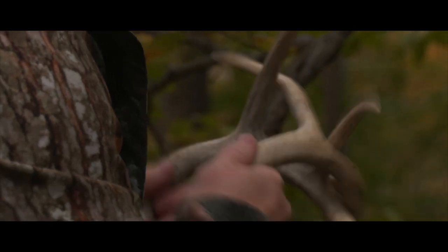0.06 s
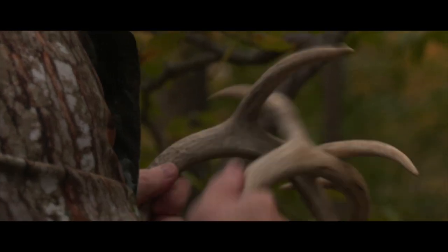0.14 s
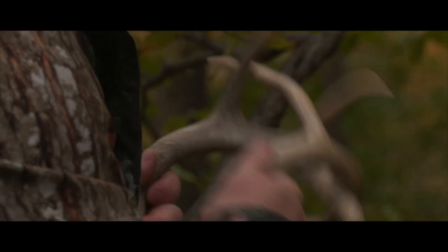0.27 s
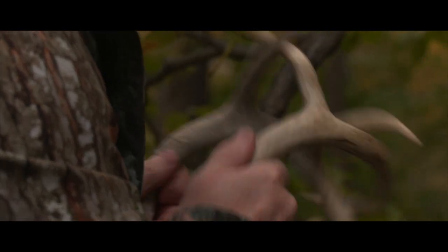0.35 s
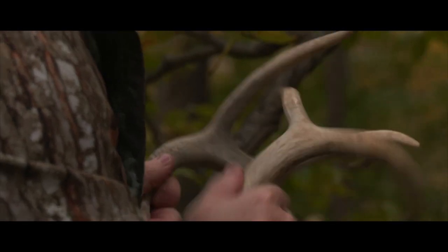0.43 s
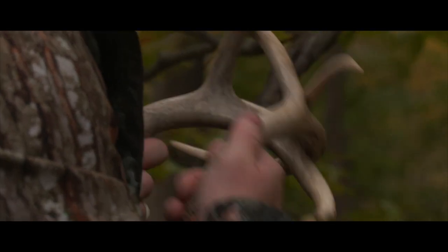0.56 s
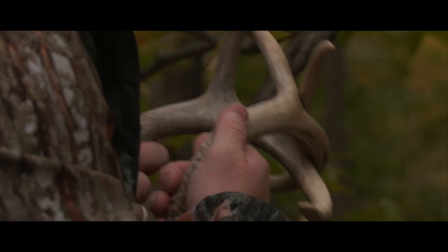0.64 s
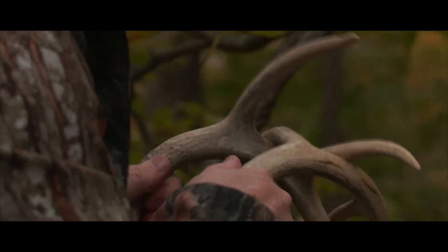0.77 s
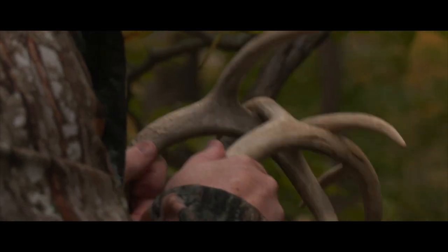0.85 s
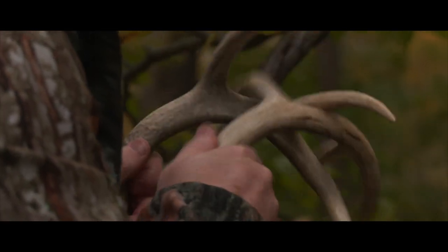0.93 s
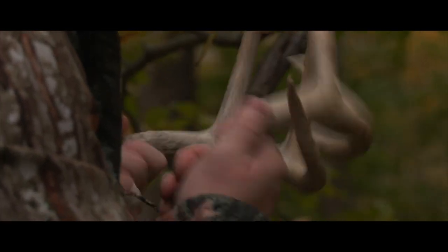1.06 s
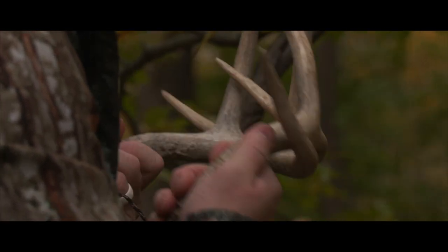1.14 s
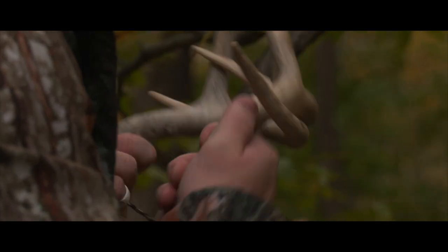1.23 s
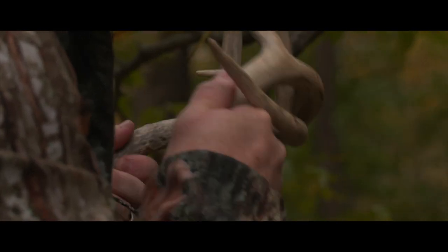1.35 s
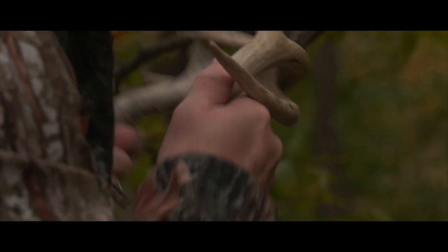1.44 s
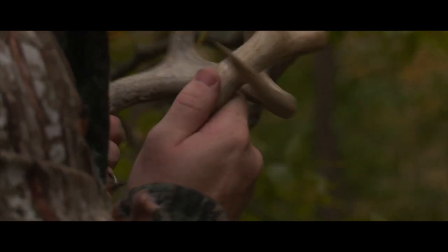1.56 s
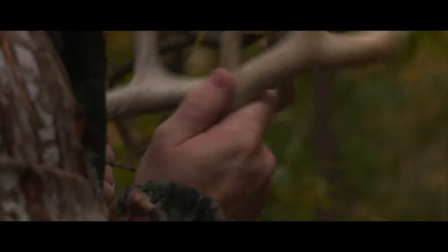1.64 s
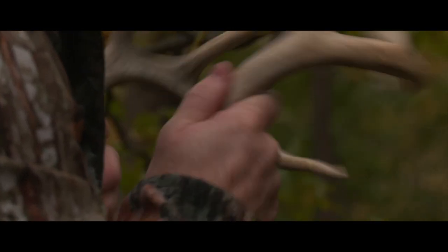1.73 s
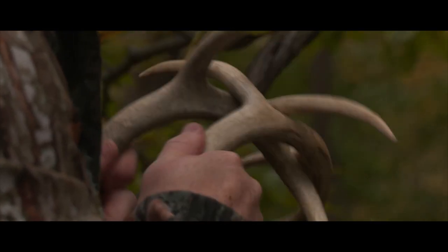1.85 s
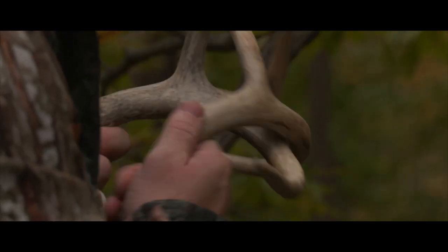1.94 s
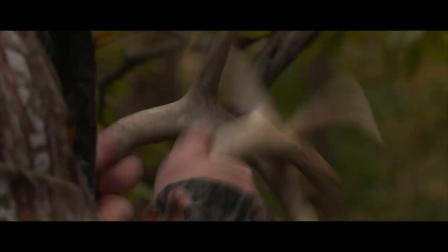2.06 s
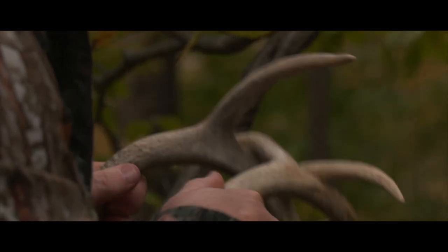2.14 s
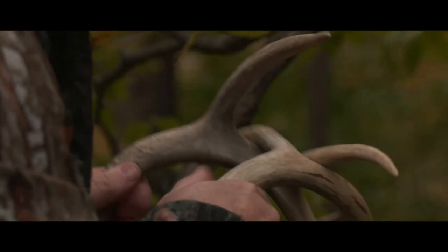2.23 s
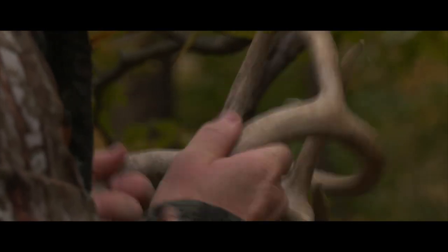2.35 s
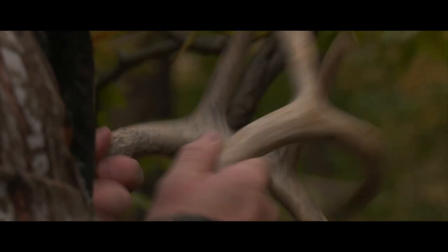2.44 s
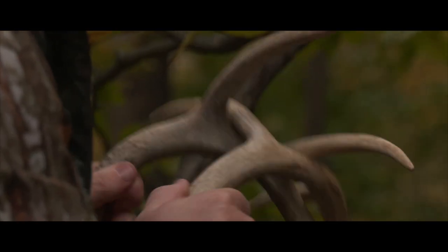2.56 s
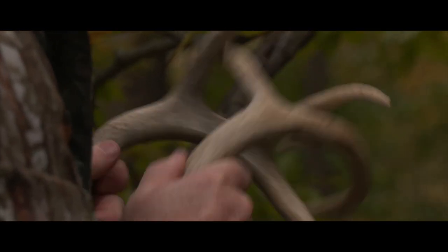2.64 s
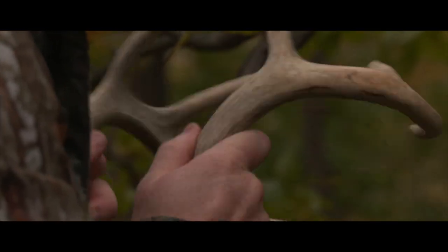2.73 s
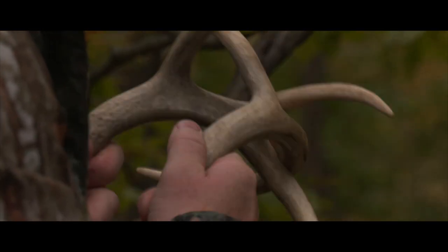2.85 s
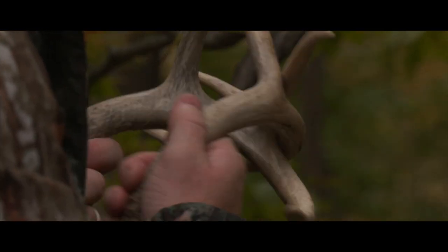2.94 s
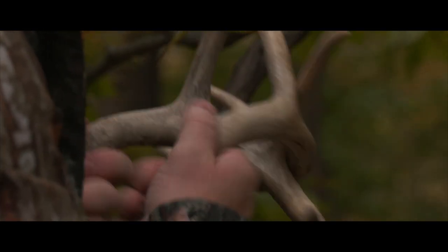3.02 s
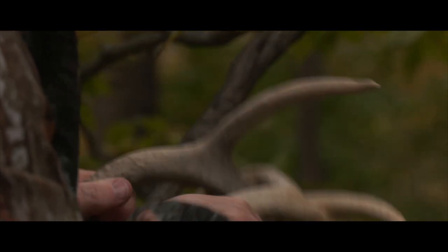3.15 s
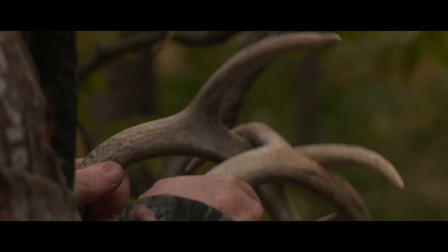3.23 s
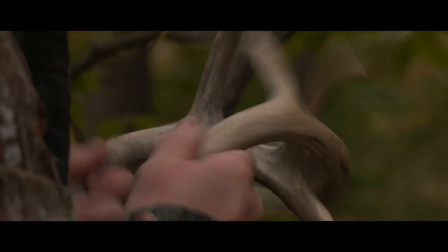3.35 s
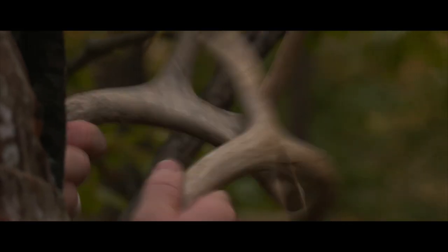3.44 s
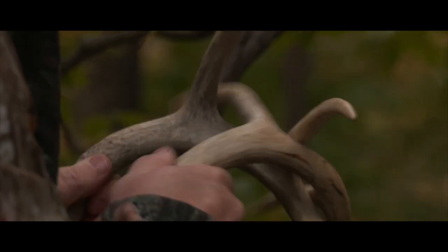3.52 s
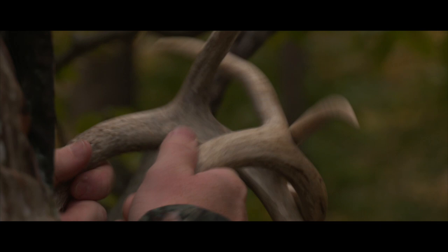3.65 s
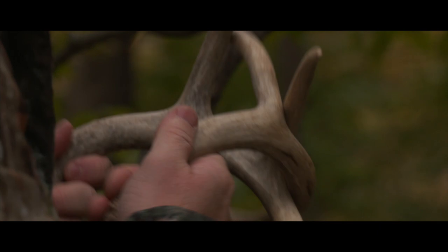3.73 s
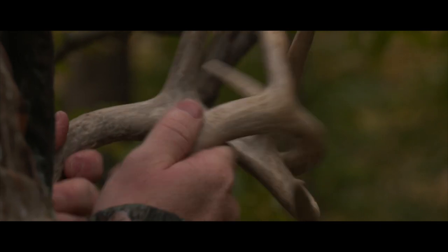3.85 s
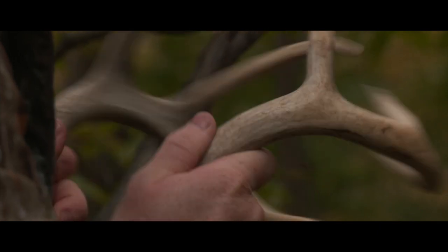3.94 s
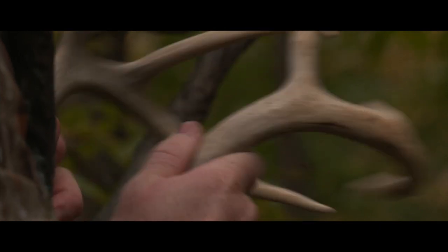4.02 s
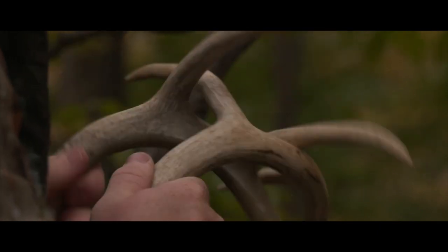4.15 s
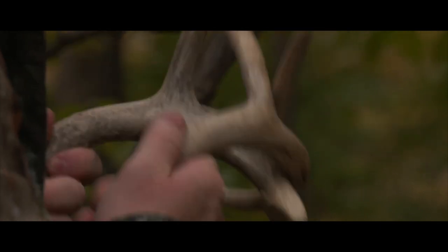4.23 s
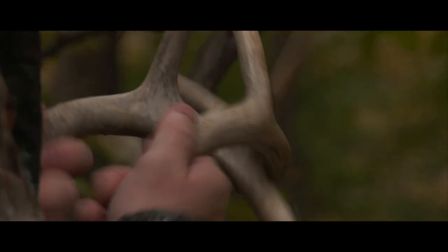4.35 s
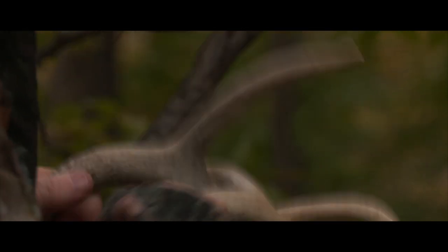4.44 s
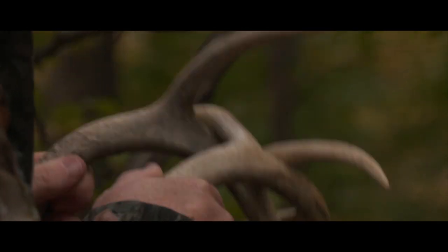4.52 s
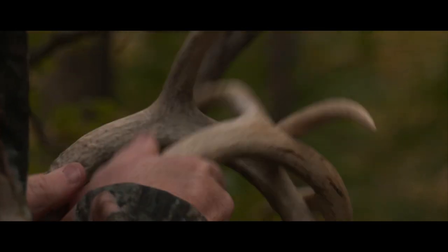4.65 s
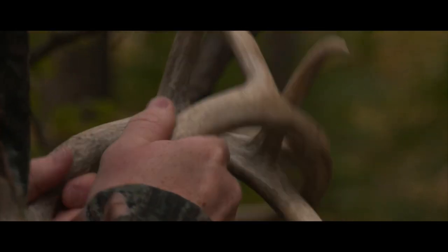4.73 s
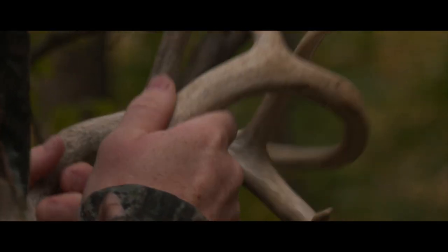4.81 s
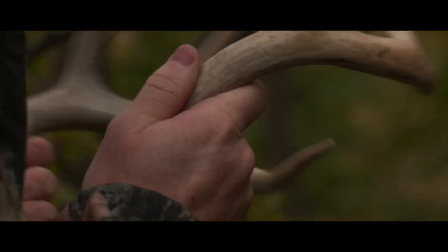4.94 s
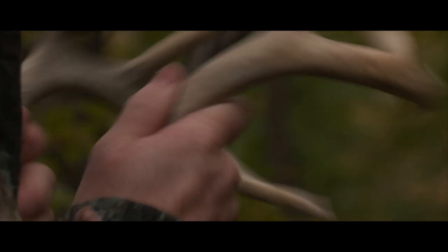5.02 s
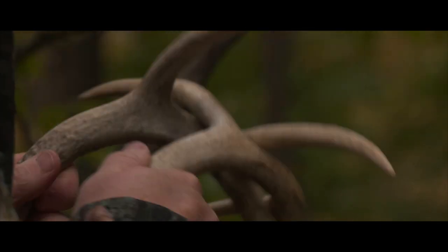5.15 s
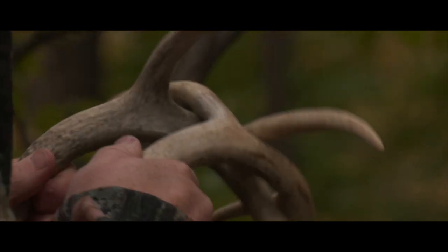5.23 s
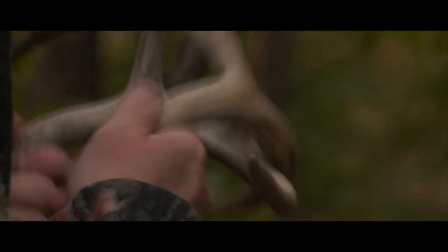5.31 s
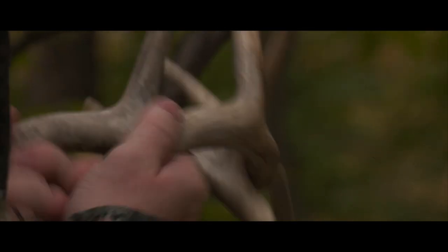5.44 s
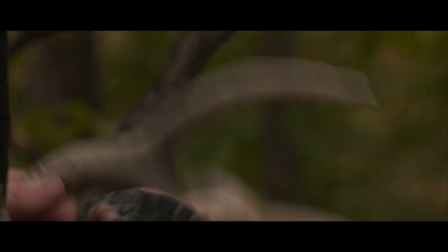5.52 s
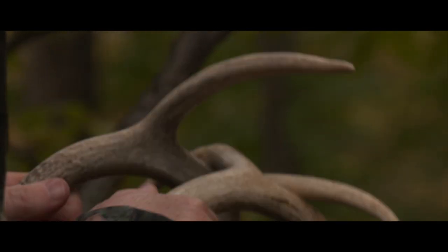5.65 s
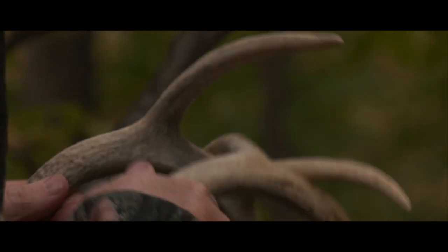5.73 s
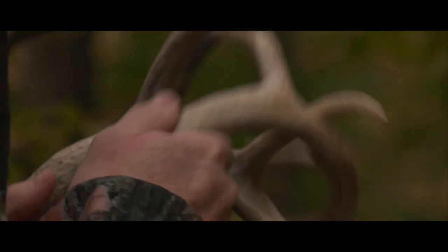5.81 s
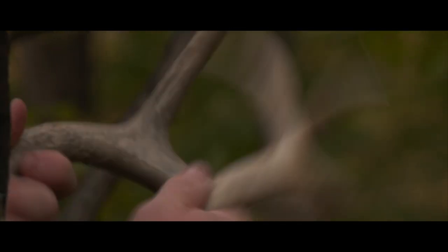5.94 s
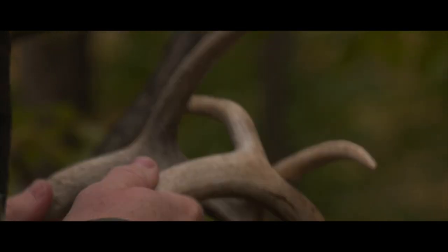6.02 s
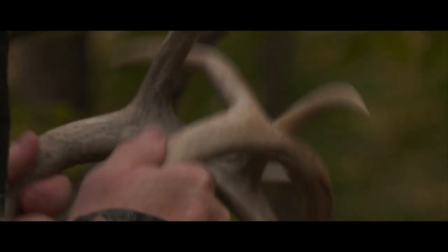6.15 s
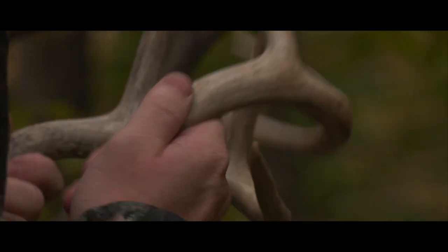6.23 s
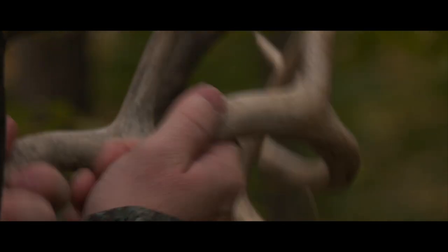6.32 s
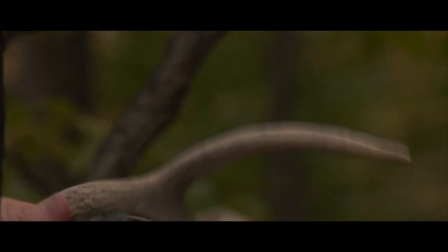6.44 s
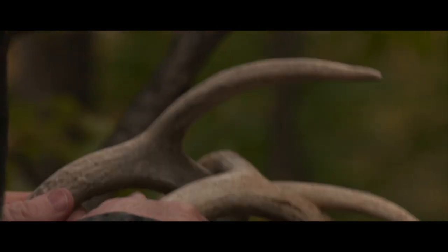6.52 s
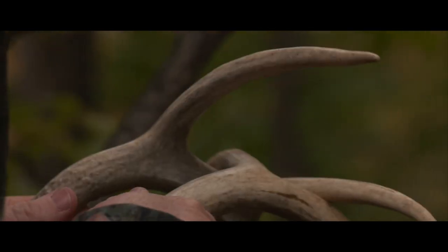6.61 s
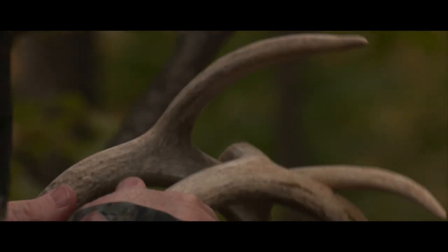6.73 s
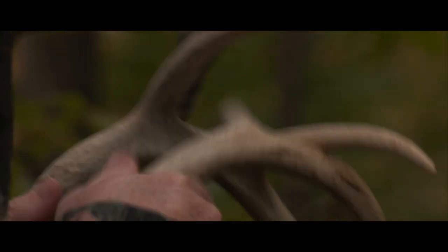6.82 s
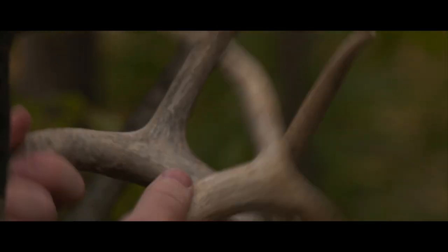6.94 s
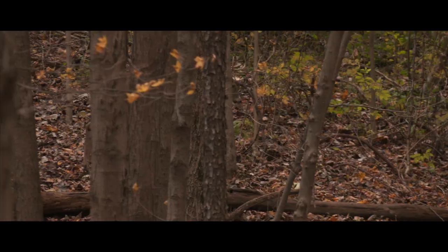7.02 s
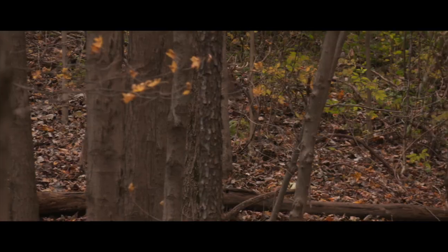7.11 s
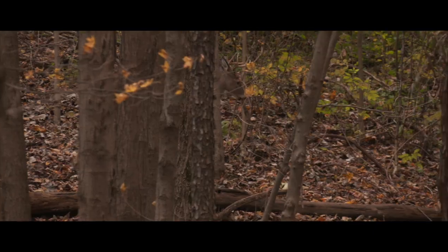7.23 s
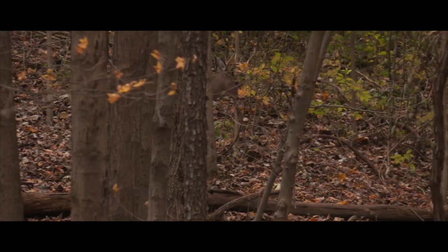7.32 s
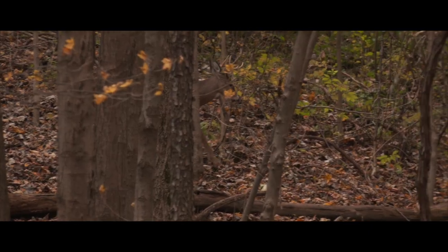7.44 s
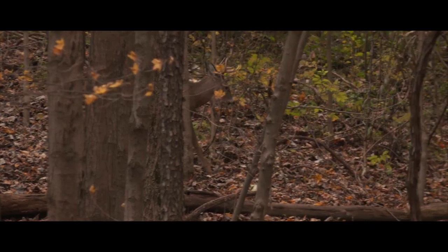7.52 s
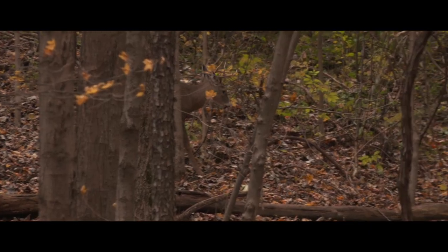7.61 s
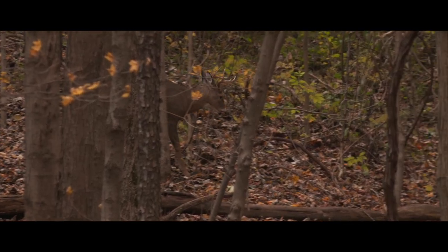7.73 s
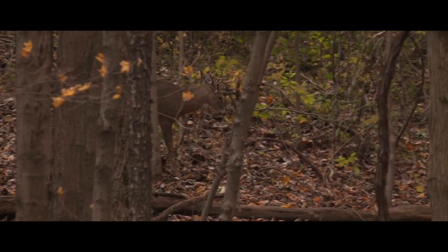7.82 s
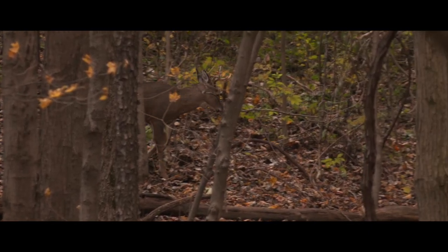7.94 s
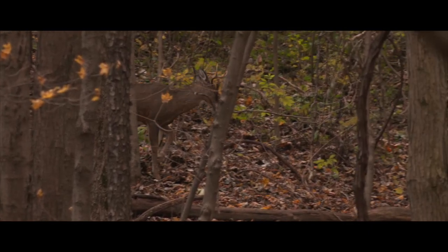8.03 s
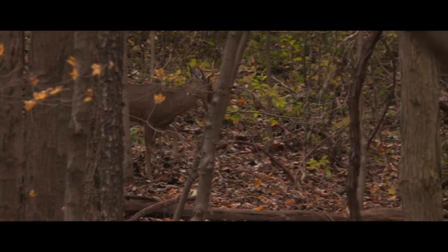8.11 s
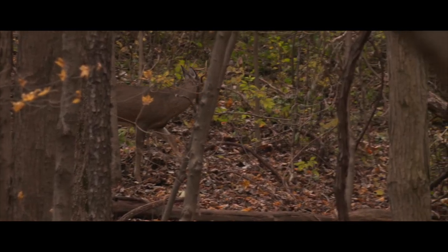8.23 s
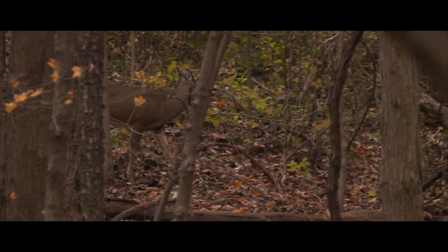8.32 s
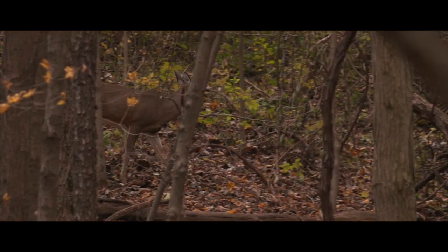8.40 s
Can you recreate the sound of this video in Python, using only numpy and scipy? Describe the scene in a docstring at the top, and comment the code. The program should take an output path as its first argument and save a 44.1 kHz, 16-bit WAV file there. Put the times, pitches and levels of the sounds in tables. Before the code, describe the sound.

Two deer antlers clack, rattle and scrape together by hand in irregular bursts, close up, then an abrupt cut to quiet woodland with faint birds.

```python
"""Two deer antlers are clacked and ground together by hand, close to the microphone, over the air of a wood.
From the start the air hisses and rumbles; soon the beams scrape by stick and slip, and blows ring short bone
modes. Each blow chatters, rebounds and carries a low thump, while trunks scatter a faint echo as decaying
noise. Just after the last clack the scene changes: all but the low rumble crossfades within 10 ms to a quieter
wood: leaf hiss of shaped noise, a far engine of a few wavering sines, gliding bird notes and one snapping twig."""
import sys
import numpy as np
from scipy import signal
from scipy.fft import rfft, irfft, next_fast_len
from scipy.io import wavfile
from scipy.ndimage import uniform_filter1d

SR = 44100
rng = np.random.default_rng(int(sys.argv[2]) if len(sys.argv) > 2 else 0)


def store_pcm(level_fs):
    """Save levels as 16-bit WAV."""
    pcm = np.round(np.clip(level_fs, -1, 1) * 32767).astype(np.int16)
    wavfile.write(sys.argv[1], SR, np.atleast_2d(pcm).T)


N = 373527
TIME = np.arange(N) / SR  # seconds

# Low rumble of the air. Each row: time in seconds, relative level in dB.
RUMBLE_LEVELS = [(0.0, -66.5), (0.52, -50.5), (1.67, -59), (2.64, -55), (3.28, -65.5), (3.73, -57),
                 (4.51, -65), (4.93, -57.5), (5.12, -67), (5.92, -61.5), (8.26, -64.5), (8.47, -62.5)]
# Spectrum of the rumble. Each row: frequency in Hz, relative level in dB.
RUMBLE_COLOUR = [(25, -21.5), (40, -7), (60, -1.5), (80, -1), (110, -1), (230, -13.5), (400, -19.5)]
# Low buffets of moving arms or air on the microphone.
# Each row: time of its height in seconds, half-length in seconds, level in dB.
BUFFETS = [(0.345, .06, -46), (.46, .08, -41.5), (0.964, .06, -46), (1.273, .08, -50.5), (2.45, .05, -49),
           (4.765, .05, -54), (6.348, .05, -52.5), (7.832, .07, -56), (8.298, .07, -58)]
# Air of the wood during the rattling. Each row: frequency in Hz, relative level in dB.
NEAR_AIR_COLOUR = [(100, -2.5), (185, -0.5), (330, -7), (800, -11), (1500, -12), (2600, -15), (3800, -16.5),
                   (5000, -10.5), (6300, -11), (7800, -23.5), (10500, -35.5), (15500, -40.5)]
# What the trees receive, and what they scatter. Each row: frequency in Hz, relative level in dB.
RADIATED_COLOUR = [(300, -21.5), (1400, -13.5), (2400, -9.5), (3400, -3.5), (4300, -2.0), (5300, 6),
                   (6500, -3.5), (7800, -18), (10000, -27.5), (15000, -39.5)]
ECHO_COLOUR = [(200, 9.0), (1500, 0.5), (4000, -3.5), (5300, -8.5), (6400, 0.0), (9000, -2.5), (15000, -8)]
# Bending modes of the pair of antlers.
# Each row: frequency in Hz, relative level in dB, t60 as a multiple of the contact's.
BONE_MODES = [(600, -10.5, 1.6), (868, -9.5, 1.6), (1222, -25, 1.5), (1250, -14, 1.5), (1443, -3.5, 1.7),
              (1827, -4.5, 1.5), (1982, -14, 1.3), (2234, -10, 1.3), (2394, -13, 1.4), (2910, -9, 1.3),
              (3030, -4, 1.3), (3287, -3, 1.1), (3510, 0, 1.2), (3727, -7, 1.1), (4080, -9, 1.1),
              (4920, -11, 1), (4920, -0.5, 1), (5085, -6, 1), (5380, 6, 1), (5690, 1.5, .9), (6330, -6, .9),
              (6753, -2, .9), (6920, -16.5, .8), (7495, -12.5, .8), (7950, -5, .7), (8740, -18, .7),
              (9220, -12, .7), (10400, -26.5, .6), (10640, -29.5, .5), (12970, -33, .5)]
# Bright crack and duller shiver of the bone. Each row: frequency in Hz, relative level in dB.
CRACK_COLOUR = [(200, -8.5), (1000, -12), (3000, 5.5), (5300, 1.5), (7000, -6.5), (10000, -13.5),
                (15000, -31.0)]
SHIVER_COLOUR = [(300, -12), (1400, -13), (3300, 1.5), (5300, -2), (6700, -3.0), (8000, -11.5),
                 (10000, -32.0), (15000, -43.0)]
# Deliberate rubs of beam along beam.
# Each row: start in seconds, end in seconds, relative level at the start in dB, at the end in dB.
SCRAPES = [(.055, .07, -44, -45), (.334, .349, -46.5, -43.5), (.349, .41, -31.5, -41.5),
           (.943, .98, -59.5, -43.5), (1.502, 1.532, -42.5, -46), (1.554, 1.633, -46.5, -36.5),
           (2.327, 2.4, -46, -39), (2.43, 2.455, -51.5, -41), (2.634, 2.696, -39, -47),
           (2.69, 2.735, -42, -33.5), (3.654, 3.687, -43, -58.5), (3.76, 3.898, -57, -50),
           (4.361, 4.414, -49, -43), (5.392, 5.42, -44.5, -53.5), (5.88, 5.976, -42.5, -44),
           (6.334, 6.36, -48, -39)]
# Blows of antler on antler. Each row: start in seconds, strength in dB, hardness in dB (0 = beam on beam,
# 12 = tip on tip), hollow knock of the beam in dB, pitch of the struck tine in Hz.
BLOWS = [(0.0736, -17.5, 1.5, 3, 3850), (0.2114, -20.5, 1.5, -0.5, 4830), (0.2217, -22.5, 3, 4.5, 6650),
         (0.2749, -27.0, 2, 1.5, 4900), (0.3485, -14.5, 2, -1, 5090), (0.474, -20.5, 2, -3.5, 4100),
         (0.48, -11.5, 12.5, 0, 6100), (0.4995, -27.5, 7, 0.5, 5870), (0.5052, -24.0, -1, -2.5, 3620),
         (0.5128, -15, 4, -2.5, 5500), (0.5271, -11.5, 4, 1.5, 4780), (0.5643, -27.5, 7, -3, 5600),
         (0.7272, -36.5, -5, 1, 3660), (0.7472, -15.5, 4, 2.5, 5230), (0.9871, -24, 3.5, -1, 4910),
         (0.9956, -33.5, 1, 0.5, 4800), (1.0235, -18, 4.5, -2, 4180), (1.0335, -21.5, 4, -5, 5310),
         (1.0439, -16.5, 5.5, -6.5, 3700), (1.0572, -15, 10, -1.5, 5220), (1.0634, -16.5, 5, -7, 3930),
         (1.0713, -24, 6, -4, 5380), (1.078, -21, 11, -5, 6160), (1.1121, -18, 1, 4.5, 4900),
         (1.12, -24, 5, 7, 5520), (1.2155, -24.0, 11.5, -3, 4810), (1.4504, -27.5, 5.5, -1.5, 5300),
         (1.7499, -12.5, 7.5, 2, 5150), (1.7752, -13, 11, 4, 5130), (1.789, -13.0, 13, -0.5, 5060),
         (1.7907, -11.5, 2.5, 0, 5350), (1.8132, -29, 5, -1.5, 4740), (1.91, -24, 0.5, 0.5, 3650),
         (1.936, -20, 3.5, 3, 5390), (2.049, -39.5, -5, 6, 3010), (2.076, -34.5, -4, 6.5, 4840),
         (2.0873, -15, 5, 2, 5320), (2.3382, -24, 3.5, -3, 4845), (2.3524, -23, 1.5, -1, 5460),
         (2.3603, -22.5, -0.5, -4.5, 4180), (2.3689, -24, 10.5, -2.5, 5100), (2.476, -33, 2, 3, 5100),
         (2.4905, -14, 2.5, 4, 4740), (2.8072, -17, 9, -1, 5630), (2.815, -16.5, 14, 3.5, 5600),
         (2.8278, -20.0, 6, -1.5, 5530), (2.846, -18, 1, 0.5, 5000), (2.9236, -18.5, 8.5, -4, 5270),
         (3.0595, -24.5, 0.5, 2.5, 3880), (3.0879, -14, 6.5, 0.5, 5530), (3.3682, -21.5, 5, -3, 5570),
         (3.3753, -24, 3, -4, 5660), (3.3809, -25, 1, 1.5, 5000), (3.3985, -29.5, 2, 1, 5630),
         (3.4591, -26.0, -0.5, 3, 4725), (3.493, -25.0, 7, 5.5, 5370), (3.5093, -24, 2, 1.5, 5030),
         (3.6925, -22.5, 3, -1.5, 3450), (3.869, -30.5, 1.5, 2.5, 5390), (4.0812, -12.5, 12, -6, 5370),
         (4.1053, -11, 8, 1.5, 5310), (4.18, -37.5, 4, 1, 5500), (4.2395, -21, 3, 1.5, 4870),
         (4.4066, -25, -1, 4, 3560), (4.4175, -13.5, 4.5, 2.5, 4890), (4.7657, -29, -2.5, -4, 3330),
         (5.0495, -15.5, 11, -1, 5550), (5.0746, -10, 8.5, 2, 5290), (5.083, -17, 2, -2, 4920),
         (5.311, -29.5, 0, 0, 4830), (5.3303, -24.5, -1, 0, 5060), (5.3401, -28.5, -5, -1.5, 3620),
         (5.4959, -26.5, -1.5, 4, 4150), (5.5083, -13, 3, 2.5, 4770), (5.8048, -26.5, -1.5, 1.5, 4400),
         (5.85, -31, 1, 1, 4860), (5.8761, -16.5, 7, -2, 5620), (5.929, -16.5, 6.5, -6, 5600),
         (5.9847, -13.5, 5, 6, 4760), (6.0317, -17, 0.5, 2, 5370), (6.1805, -26.0, 2.5, -2.5, 5600),
         (6.207, -25.5, 1, -1, 4640), (6.2504, -34.5, 8.5, 1, 5670), (6.3667, -13, 3, -1.5, 3460),
         (6.3786, -25.5, 1, -2, 5120), (6.3963, -11, 5, -0.5, 5200), (6.8744, -25.5, 1, -2.5, 4160),
         (6.8895, -17.0, -0.5, -3.5, 3640), (6.898, -23, 3, 2, 5640), (6.9055, -16.5, 3, 0, 5200),
         (6.978, -20, -3.5, 3, 3420), (7.0032, -29.0, 3, 5.5, 4900)]
# Edges in Hz of the five registers thud, knock, clack, ring, tick.
REGISTER_EDGES = [250, 1100, 2200, 4400, 7200, 16000]
# How a blow shares its energy, for thud, knock, clack, ring, tick in turn.
# Each row: level in dB, dB per dB of hardness, dB per dB of strength, dB per dB of hollow knock.
REGISTER_SHARES = [(-23.5, -0.39, -0.25, 0.58), (-15, -0.92, -0.23, 1.23), (-3.8, -0.65, -0.005, -0.16),
                   (-3, .35, 0, 0), (-16.5, 0.12, 0.16, -0.06)]
# Air of the quiet wood afterwards. Each row: frequency in Hz, relative level in dB.
FAR_AIR_COLOUR = [(100, -8), (200, -13), (400, -13), (700, -20), (1100, -23.5), (1800, -29.5),
                  (2400, -28.5), (3300, -33.5), (4700, -30.5), (6200, -29), (7500, -39), (10000, -42.5),
                  (15500, -41)]
# Lines of a far engine. Each row: frequency in Hz, relative level in dB.
ENGINE_LINES = [(193.8, -67.5), (339.1, -74.5), (387.6, -68.5), (586.8, -76), (780.6, -80)]
# Distant bird notes. Each row: start in seconds, length in seconds, start pitch in Hz,
# middle pitch in Hz, end pitch in Hz, relative level in dB.
BIRD_NOTES = [(7.0, 0.093, 4290, 4180, 4090, -71.5), (7.1, 0.099, 2280, 2790, 2153, -71),
              (7.219, 0.096, 2190, 2107, 2065, -80), (7.489, 0.13, 2070, 2100, 2074, -81),
              (7.9, 0.063, 2180, 2130, 2074, -81), (8.0, .14, 2330, 2460, 2380, -78),
              (8.04, 0.16, 8500, 8720, 8680, -84.5)]
# A twig snaps far off. The single row: start in seconds, relative level in dB.
TWIG = (7.638, -55)
# Spectrum of the snap. Each row: frequency in Hz, relative level in dB.
SNAP_COLOUR = [(1400, -4), (1900, 4), (2800, -14), (4000, 5), (5200, -1), (7500, -21)]

USUAL_DB = -20  # strength of an ordinary blow
RING_S, RING_HALVES_DB = 0.027, 20  # base t60 at hardness 0; it halves with this much hardness
REBOUND_S, REBOUND_DB = .016, -21  # typical delay and typical level of the second touch
PRESSED_S, GRIND_DB = .045, -45  # blows closer than this grind in between, at this relative level
QUIET_FROM_S = 7.022  # middle of the crossfade to the quiet wood
ENGINE_PEAK_S, ENGINE_FADE_DB_PER_S = 7.72, 8.5  # loudest moment, and fade to either side
CEILING, TOP_HZ = 0.56, 16000  # amplitude the peaks are rounded towards; top of the passband


def undb(db):
    """Decibels to gain."""
    return 10 ** (np.asarray(db) / 20)


def unit(x):
    """Scale to rms 1."""
    return x / np.sqrt(np.mean(x ** 2) + 1e-20)


def add(track, s, sound):
    """Mix a sound into a track at time s."""
    i = max(int(s * SR), 0)
    track[i:i + len(sound)] += sound[:max(N - i, 0)]


def band(x, lo_hz, hi_hz):
    """Causal band-pass."""
    return signal.sosfilt(signal.butter(2, [lo_hz, hi_hz], "band", fs=SR, output="sos"), x)


def coloured(points, size=N):
    """Noise of rms 1 with a (Hz, dB) spectrum, falling away beyond its end points."""
    hz, db = np.transpose(points)
    n = next_fast_len(size)
    f = np.maximum(np.fft.rfftfreq(n, 1 / SR), 1)
    gain = undb(np.interp(np.log(f), np.log(hz), db))
    gain = gain * np.minimum(f / hz[0], 1) ** 2 * np.minimum(hz[-1] / f, 1) ** 2
    return unit(irfft(rfft(rng.standard_normal(n)) * gain, n)[:size])


def walk(rate):
    """Random drift of spread near 1, gliding between `rate` fresh values per second."""
    knots = rng.standard_normal(int(N / SR * rate) + 2)
    return np.interp(TIME * rate, np.arange(len(knots)), knots)


def sine(hz):
    """Sine that follows a moving pitch."""
    return np.sin(2 * np.pi * np.cumsum(hz) / SR)


def fade(t, t60):
    """Exponential decay, 60 dB down after t60."""
    return np.exp(-np.log(1000) * t / np.maximum(t60, 1e-4))


def near_air(level_db=-56.5, sway_db=1.0):
    """Shaped noise for the air of the wood during the rattling, swaying gently in level."""
    return coloured(NEAR_AIR_COLOUR) * undb(level_db + sway_db * walk(3))


def rumble(level_db=2.0, flutter_db=1.5):
    """Low rumble of the air, swelling briefly with each buffet."""
    s, db = np.transpose(RUMBLE_LEVELS)
    power = undb(np.interp(TIME, s, db) + level_db) ** 2
    for middle, half, buffet_db in BUFFETS:
        power = power + undb(buffet_db) ** 2 * np.exp(-2 * ((TIME - middle) / half) ** 2)
    return coloured(RUMBLE_COLOUR) * np.sqrt(power) * undb(flutter_db * walk(16))


def radiated(x, earlier_db=-17):
    """Each mode beams its own way, so the trees get an even blend: noise with the loudness of the blows."""
    power = np.maximum(uniform_filter1d(x ** 2, size=64), 0)
    power += undb(earlier_db) ** 2 * fade(TIME, .02)  # the wood still rings from an earlier clack
    return np.sqrt(power) * coloured(RADIATED_COLOUR)


def trunks(x, early_db=-24, early_t60=0.097, late_db=-22, late_t60=0.69, patchy_db=4):
    """Echo of the wood: near trunks and ground give a short scatter, far ones a long thin tail."""
    t = np.arange(int(1.5 * SR)) / SR
    patches_db = patchy_db * np.repeat(rng.standard_normal(len(t) // 64 + 1), 64)[:len(t)]
    scatter = unit(coloured(ECHO_COLOUR, size=len(t)) * undb(patches_db))
    onset = np.clip(t / 0.007, 0, 1) ** 2
    echo = 0
    for db, t60 in ((early_db, early_t60), (late_db, late_t60)):
        tail = scatter * fade(t, t60) * onset
        echo = echo + undb(db) * tail / np.sqrt(np.sum(tail ** 2))
    return signal.fftconvolve(x, echo)[:N]


def bone(tine_hz, t60, tine_db=7.0, detune=0.025, tine_ring=0.59, crack_db=3, crack_t60=0.0035,
         body_db=1, body_ring=0.74, shiver_db=-21, shiver_t60=0.09):
    """Response to one tap: the spot that is struck weights the modes, the grip detunes them."""
    t = np.arange(2600) / SR
    hz, db, life = np.transpose(BONE_MODES)
    weight, shift = rng.standard_normal((2, len(hz)))
    modes = np.sin(2 * np.pi * np.outer(hz * (1 + detune * shift), t)) * fade(t, t60 * life[:, None])
    ringing = (weight * undb(db)) @ modes
    tine = undb(tine_db) * np.sin(2 * np.pi * tine_hz * t) * fade(t, tine_ring * t60)
    # countless weak modes: a bright crack at the contact, and a duller shiver through the branches
    crack = undb(crack_db) * coloured(CRACK_COLOUR, size=len(t)) * fade(t, crack_t60)
    dense = coloured(SHIVER_COLOUR, size=len(t))
    shiver = dense * (undb(body_db) * fade(t, body_ring * t60) + undb(shiver_db) * fade(t, shiver_t60))
    return ringing + tine + crack + shiver


def rubs():
    """All spans in which bone slides on bone: the deliberate rubs and the short gaps between close blows."""
    times = [s for s, *_ in BLOWS]
    grinds = [(a, b, GRIND_DB, GRIND_DB) for a, b in zip(times, times[1:]) if b - a < PRESSED_S]
    return list(SCRAPES) + grinds


def scrapes(slips_per_s=900, spread_db=6.5, catch_db=2, tine_hz=4900, t60=0.021, level_db=-1.5):
    """Knobbly bone sticks and slips: a shower of tiny taps whose colour changes as the contact travels."""
    n = 400  # samples of travel between two knobs of the bone
    out = np.zeros(N)
    for start, end, first_db, last_db in rubs():
        for s in np.arange(start, end, n / SR):
            slips = (rng.random(n) < slips_per_s / SR) * undb(spread_db * rng.standard_normal(n))
            slips[rng.integers(n)] = 1  # every knob slips at least once
            rub = signal.fftconvolve(slips, bone(tine_hz, t60))
            rub_db = np.interp(s, [start, end], [first_db, last_db]) + catch_db * rng.standard_normal()
            add(out, s, undb(rub_db) * rub * np.sqrt(n / np.sum(rub ** 2)))
    return undb(level_db) * band(out, 1000, 8000)


def clacks(chatter=.4, chatter_s=.002, scatter_db=.5, rebound_spread_db=3):
    """Each blow chatters within milliseconds, then rebounds; hard ones ring higher and shorter, weak ones duller."""
    splits = [signal.butter(4, edges, "band", fs=SR, output="sos")
              for edges in zip(REGISTER_EDGES, REGISTER_EDGES[1:])]
    blow_samples = .005 * SR  # every register is first set to the energy of 5 ms at rms 1
    share_db, by_hardness, by_strength, by_knock = np.transpose(REGISTER_SHARES)
    out = np.zeros(N)
    for s, db, hardness, knock, tine_hz in BLOWS:
        tap = bone(tine_hz, RING_S * .5 ** (hardness / RING_HALVES_DB))
        lag = int(SR * chatter_s * rng.uniform(.2, 1)) + 1
        tap = tap + chatter * np.pad(tap, (lag, 0))[:len(tap)]
        colour_db = share_db + by_hardness * hardness + by_strength * (db - USUAL_DB) + by_knock * knock
        gains = undb(db + colour_db + scatter_db * rng.standard_normal(len(splits)))
        parts = np.array([signal.sosfilt(split, tap) for split in splits])
        clack = (gains * np.sqrt(blow_samples / np.sum(parts ** 2, axis=1))) @ parts
        add(out, s, clack)
        # the antlers spring apart and touch again, later and weaker
        rebound = undb(REBOUND_DB + rebound_spread_db * rng.standard_normal()) * clack
        add(out, s + REBOUND_S * rng.uniform(.5, 1.4), rebound)
    return out


def thumps(below_blow_db=-27, thump_hz=120, t60=0.031):
    """A short, damped low thump under each blow, growing with its strength."""
    t = TIME[:SR // 10]
    out = np.zeros(N)
    for s, db, *_ in BLOWS:
        thump = np.sin(2 * np.pi * thump_hz * rng.uniform(.7, 1.5) * t) * fade(t, t60)
        add(out, s, undb(db + below_blow_db) * thump)
    return out


def birds(warble=0.022):
    """Whistled notes: each sine bends through three pitches, warbling, and swells and dies smoothly."""
    out = np.zeros(N)
    quaver = 1 + warble * walk(150)
    for s, length, first_hz, middle_hz, last_hz, db in BIRD_NOTES:
        u = np.linspace(0, 1, int(length * SR))
        bend = np.polyfit([0, .5, 1], [first_hz, middle_hz, last_hz], 2)
        hz = np.polyval(bend, u) * quaver[:len(u)]
        swell = np.sqrt(2 * np.abs(np.sin(np.pi * u)))
        add(out, s, undb(db) * swell * sine(hz))
    return out


def far_air(level_db=-64):
    """Steady shaped noise for the leaf hiss of the quiet wood."""
    return coloured(FAR_AIR_COLOUR) * undb(level_db)


def engine(level_db=2, waver_db=1.8):
    """A far engine drones on a few sines that waver in level and pitch, swelling to a peak and fading."""
    drone = 0
    for hz, db in ENGINE_LINES:
        drone = drone + undb(db + waver_db * walk(4)) * sine(hz * (1 + .003 * walk(3.2)))
    swell_db = level_db - ENGINE_FADE_DB_PER_S * np.abs(TIME - ENGINE_PEAK_S)
    return undb(swell_db) * np.sqrt(2) * drone


def twig():
    """A snapping twig: one burst of shaped noise that dies at once."""
    t = TIME[:SR // 10]
    s, db = TWIG
    out = np.zeros(N)
    add(out, s, undb(db) * coloured(SNAP_COLOUR, size=len(t)) * fade(t, 0.037))
    return out


def among_trees(calls, direct_db=-1, echo_db=16.5):
    """Sounds from deep in the wood arrive both directly and as a strong echo off the trunks."""
    return undb(direct_db) * calls + undb(echo_db) * trunks(calls)


def gain_control(x, threshold_db=-8, squeeze=0.48, attack_s=0.0067, release_s=0.93):
    """The hardest clacks push the gain down, so the wood ducks and swells back after them."""
    leak = TIME / release_s
    held = np.maximum.accumulate(np.log(np.abs(x) + 1e-9) + leak, axis=-1) - leak  # log of a slowly falling peak
    over = np.maximum(held - np.log(undb(threshold_db)), 0)
    pole = np.exp(-1 / (attack_s * SR))
    return x * np.exp(-squeeze * signal.lfilter([1 - pole], [1, -pole], over))


def scene():
    """The scene changes: the rattling and its echo crossfade within 10 ms to the quiet wood, over one
    continuous low rumble."""
    air, low = near_air(), rumble()
    antlers = scrapes() + clacks()
    near = antlers + thumps() + trunks(radiated(antlers)) + air
    far = among_trees(birds() + twig()) + far_air() + engine()
    quiet = np.clip((TIME - QUIET_FROM_S) / .01 + .5, 0, 1)  # 10 ms crossfade
    return (near * (1 - quiet) + far * quiet + low)[None]


def record(dry, drive_db=-1.2):
    """The recorder ducks after the hardest clacks, rounds their peaks and cuts the top."""
    x = signal.resample_poly(gain_control(dry * undb(drive_db)), 2, 1, axis=-1)  # oversample the rounding
    rounded = x / (1 + (x / CEILING) ** 6) ** (1 / 6)
    x = signal.resample_poly(rounded, 1, 2, axis=-1)
    return signal.sosfilt(signal.ellip(8, .2, 70, TOP_HZ, fs=SR, output="sos"), x)


dry = scene()
out = record(dry)
store_pcm(out)
```